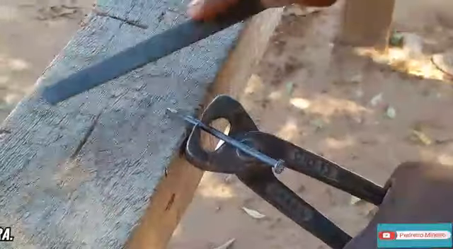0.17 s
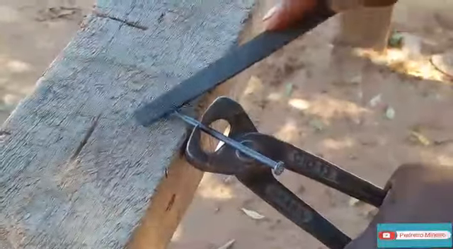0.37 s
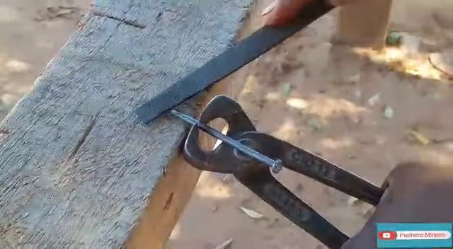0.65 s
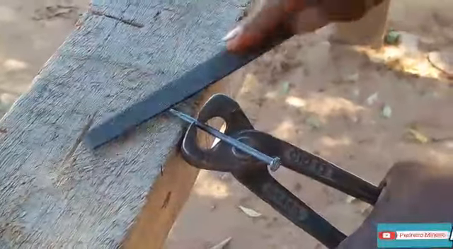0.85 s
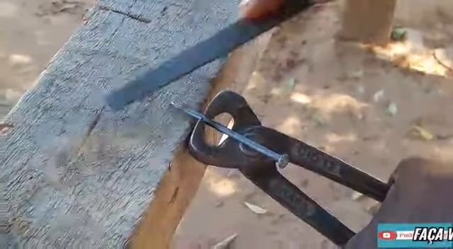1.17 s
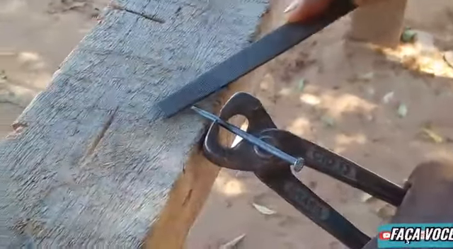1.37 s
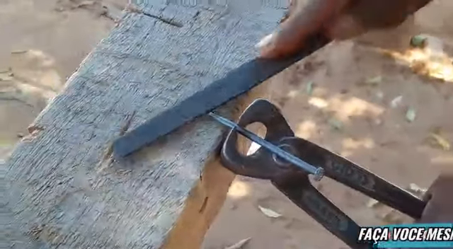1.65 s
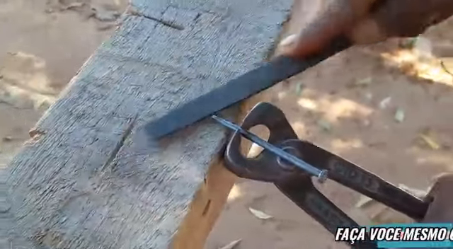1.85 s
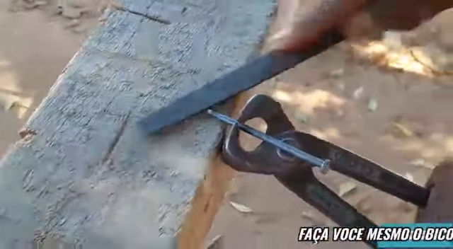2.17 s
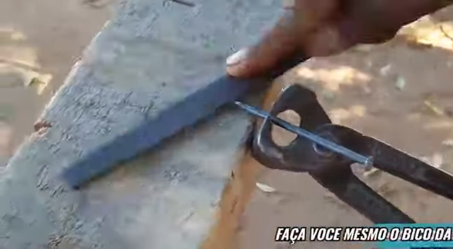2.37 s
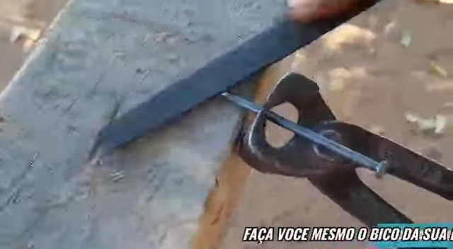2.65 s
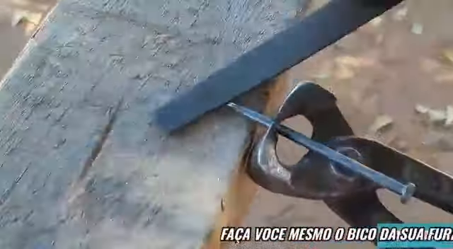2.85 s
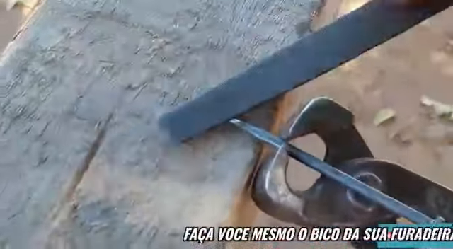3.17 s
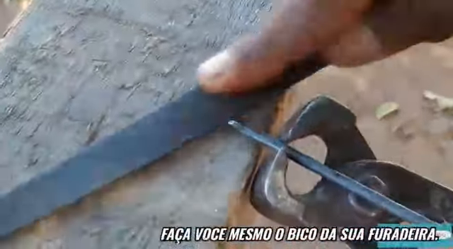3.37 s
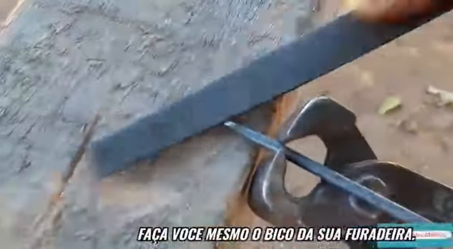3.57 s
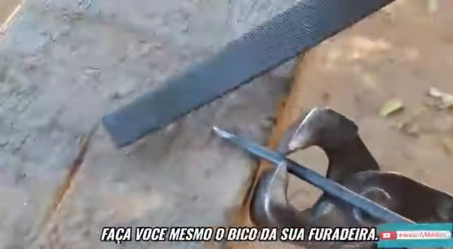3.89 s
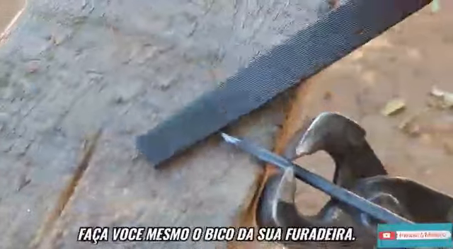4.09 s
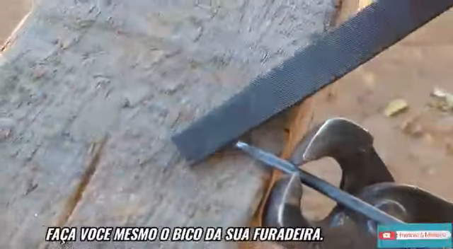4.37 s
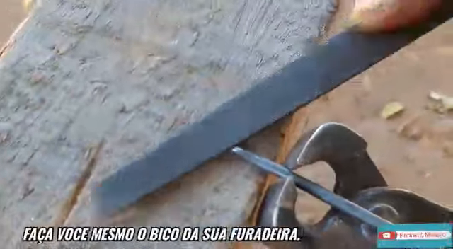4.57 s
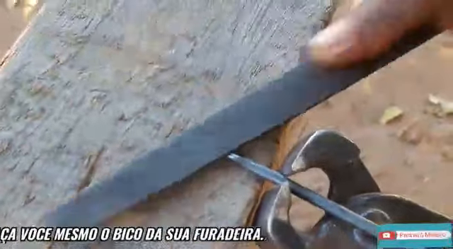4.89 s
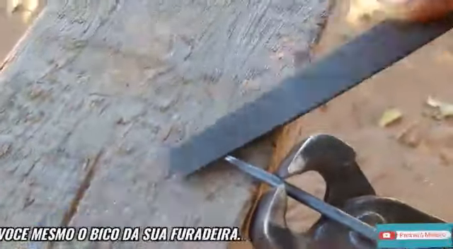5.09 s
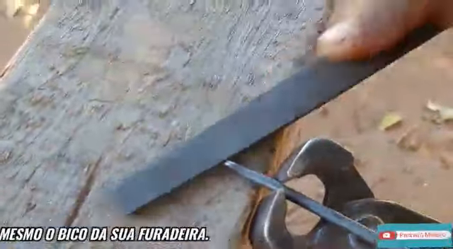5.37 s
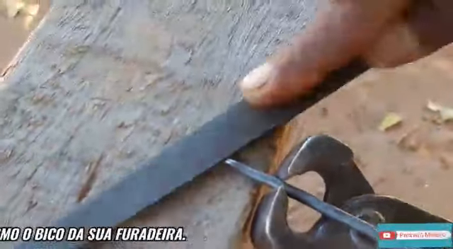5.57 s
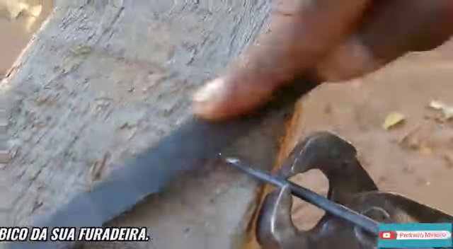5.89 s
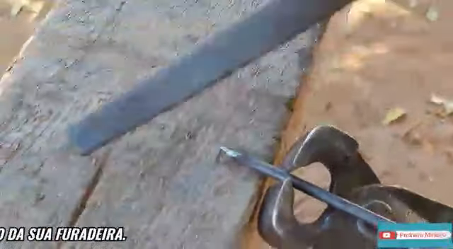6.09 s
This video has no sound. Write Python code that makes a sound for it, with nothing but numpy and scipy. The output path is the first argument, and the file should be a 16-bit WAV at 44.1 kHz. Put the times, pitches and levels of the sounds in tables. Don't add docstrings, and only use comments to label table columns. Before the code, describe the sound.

Dry, grainy metal rasping, very near and without room echo. After an opening stroke and small clicks, about six pushes alternate with lighter pulls. The file then touches, ticks and drags quietly before four more pushes and their returns, ending in faint handling and one soft stroke. Firm pushes ring steel and sing roughly; dull wooden thumps and a distant outdoor murmur lie under them.

```python
import sys
import numpy as np
from scipy import signal
from scipy.fft import rfft, irfft, next_fast_len
from scipy.io import wavfile
from scipy.ndimage import uniform_filter1d, map_coordinates

SR = 44100
rng = np.random.default_rng(int(sys.argv[2]) if len(sys.argv) > 2 else 0)


def gain_from_decibels(decibels):
    exponent = np.asarray(decibels, float) / 20
    return 10 ** exponent


def transcribe(u):
    v = np.clip(np.atleast_2d(u).T, -1, 1)
    q = np.round(v * 32767).astype(np.int16)
    wavfile.write(sys.argv[1], SR, q)


N = 274561


def unit(x):
    return x / np.sqrt(np.mean(x ** 2) + 1e-20)


def along(points, hz):
    f, v = np.transpose(points)
    return np.interp(np.log(hz + 1), np.log(f + 1), v)


def curve(rows):
    s, value = np.transpose(sorted(rows))
    return np.interp(np.arange(N) / SR, s, value)


def wobble(rate):
    knots = rng.standard_normal(int(N * rate / SR) + 4)
    return map_coordinates(knots, [np.arange(N) * rate / SR])


def filtered(x, response):
    m = next_fast_len(N + SR // 2)
    hz = np.fft.rfftfreq(m, 1 / SR)
    return irfft(rfft(x, m) * response(hz), m)[..., :N]


def noise(spectrum):
    return unit(filtered(rng.standard_normal(N), lambda hz: gain_from_decibels(along(spectrum, hz))))


def modes(peaks, hz):
    total = 0
    for k, (centre, width, db) in enumerate(peaks):
        damping = 1j * hz * width
        total = total + (-1) ** k * gain_from_decibels(db) * damping / (centre ** 2 - hz ** 2 + damping)
    return total


def yard():
    # f/Hz, level/dB per Hz
    floor_colour = [(15, -34.5), (25, -1.5), (129, -5.5), (247, -8.5), (412, -13.5), (705, -16.5),
                    (1150, -22.5), (2500, -22.5), (2710, -24.5), (5770, -35.5), (7970, -43), (15600, -41)]
    # t/s, level/dB
    floor_level = [(0, -67.5), (.3, -63), (1, -62), (3, -60), (3.8, -65.5), (5.2, -60), (5.8, -68),
                   (6.22, -61.5)]
    # middle t/s, half length/s, f/Hz, level/dB
    engines = [
        (0.562, 0.11, 237, -61.5),
        (4.874, 0.059, 549.4, -44),
        (5.143, 0.079, 549, -49),
        (5.33, 0.076, 234.4, -62),
        (5.551, 0.069, 710, -69),
        (5.71, 0.051, 555, -59),
    ]
    t = np.arange(N) / SR
    swell_db = 1.5 * wobble(9)
    out = gain_from_decibels(curve(floor_level) + swell_db) * noise(floor_colour)
    for middle, half, hz, db in engines:
        u = np.clip((t - middle) / half, -1, 1)
        phase = 2 * np.pi * np.cumsum(hz * (1 - 0.059 * u)) / SR
        out += gain_from_decibels(db) * np.sqrt(1 - u ** 2) * np.sin(phase)
    return filtered(out, lambda hz: 1 / (1 + (55 / (hz + 1)) ** 3))


def strokes():
    # start t/s, length/s, file body level/dB at full speed, pincers and plank dB above it, edge dB above it
    forward = [
        (1.062, 0.18, -27.5, -3, -6.5),
        (1.393, 0.18, -26, -6.5, -5),
        (1.73, 0.16, -28, -1, 0),
        (2.044, 0.18, -27, -0.5, -1.5),
        (2.374, .16, -27.5, 1, 2.5),
        (2.686, 0.17, -30.5, 5, 6),
        (3.988, .17, -34, 6.5, 5.5),
        (4.304, 0.17, -29.5, 6.5, 3.5),
        (4.612, .16, -28.5, 5, 2.5),
        (4.922, 0.15, -27, 2.5, 2),
    ]
    backward = [(1.22, 0.16, -31, 0.5, 1.8), (1.558, 0.17, -31, -1, 3), (1.884, .16, -33, 0, 5),
                (2.208, 0.17, -32.5, 3, 5.9), (2.524, 0.17, -34.5, 5.5, 7.6),
                (2.837, 0.17, -36.5, 3.5, 10.4), (3.82, 0.18, -41, 9, 7.1), (4.148, .16, -37, 5.5, 10),
                (4.458, 0.16, -35.5, 5.5, 9.7), (4.762, 0.17, -36.5, 5.5, 11),
                (5.066, .182, -34.5, 4.5, 9.8)]
    lone = [
        (0.05, 0.22, -33, 0, -0.5),
        (0.85, 0.19, -33, 1.5, 1),
        (5.945, .22, -42.5, 4.5, 6.5),
    ]
    for table, lean, ease in ((forward, 0.97, 1), (backward, 0.87, 1), (lone, 1.29, 1.65)):
        for s, length, db, low_db, edge_db in table:
            start, count = round(s * SR), round(length * SR)
            u = np.arange(count) / count
            speed = np.abs(np.sin(np.pi * u ** lean)) ** ease
            yield slice(start, start + count), speed, np.array([[db + low_db], [db], [db + edge_db]])


def plank():
    # f/Hz, level/dB per Hz
    thump_colour = [(53, -51), (90, -20), (189, -4.5), (490, -4), (520, -5), (680, -8), (1140, -120)]
    # middle t/s, level/dB, half length/s
    jolts = [
        (0.212, -45, 0.016),
        (1.512, -46.5, .03),
        (1.955, -47, 0.048),
        (2.988, -52, 0.069),
        (3.41, -60, 0.14),
        (4.27, -42.5, 0.044),
        (4.844, -53.5, 0.06),
        (5.183, -43.5, 0.057),
        (5.673, -55, 0.063),
    ]
    t, force = np.arange(N) / SR, np.zeros(N)
    for where, speed, levels_db in strokes():
        top_db = -51 + 0.12 * (levels_db[1] + 31.5)
        force[where] += gain_from_decibels(top_db) * speed ** 0.59
    for s, db, half in jolts:
        force += gain_from_decibels(db) * np.clip(1 - np.abs(t - s) / half, 0, 1)
    return force * gain_from_decibels(3.0 * wobble(30)) * noise(thump_colour)


def effort():
    # start t/s, hold/s, file body level/dB, pincers and plank dB above it, edge dB above it
    slides = [(0.245, 0.06, -67, 2, 3), (0.309, 0.019, -58.5, 1, -3.5), (0.36, 0.082, -77.5, 2, 9),
              (0.558, 0.022, -43, -1.5, -12), (0.638, 0.043, -62, -5, 2.5), (0.695, .05, -57, 0.5, -1.5),
              (0.77, 0.2, -63.5, -2, -6), (3.012, 0.03, -59.5, -1.5, 0), (3.07, 0.39, -66, -1.5, -6.5),
              (3.246, .055, -53.5, -2, -8), (3.353, 0.037, -58.5, 10, -8.5), (3.426, 0.033, -68, 13.5, 0.5),
              (3.504, 0.049, -47, -0.5, -9.5), (3.564, 0.064, -66, -3, 0.5),
              (3.634, 0.039, -68.5, 15.5, -2), (3.724, 0.023, -76, 16, 1), (5.224, 0.026, -58, 9, 2),
              (5.256, 0.07, -68, 0.5, -5), (5.422, 0.051, -66, -12.5, -3), (5.62, 0.087, -63, 10.5, -2.5),
              (5.855, 0.0085, -49.5, 0, -2.5), (5.916, .1, -71, 10, 3), (6.133, 0.022, -59.5, 2, 2)]
    speed_power = np.c_[[1.71, 2.07, 1.77]]
    pincers_limit_db, rest_db = -2, -82.5
    turn_db, turn_s = -29, 0.017
    land_s, lift_db_per_s = 0.0045, 555
    t, power = np.arange(N) / SR, np.full((3, N), gain_from_decibels(2 * rest_db))
    for where, speed, levels_db in strokes():
        gain = speed ** speed_power
        gain[0] = gain[0] / np.hypot(gain[0], gain_from_decibels(pincers_limit_db))
        power[:, where] += (gain_from_decibels(levels_db) * gain) ** 2
    lingering = np.abs(uniform_filter1d(power, size=round(8 * turn_s * SR), axis=1))
    power += gain_from_decibels(2 * turn_db) * lingering
    for s, hold, db, low_db, edge_db in slides:
        where = slice(round(s * SR), round((s + hold) * SR) + SR // 10)
        age = t[where] - s
        landing = np.clip(age / land_s, 0, 1)
        gain = landing * gain_from_decibels(-lift_db_per_s * np.maximum(age - hold, 0))
        power[:, where] += (gain_from_decibels([[db + low_db], [db], [db + edge_db]]) * gain) ** 2
    return 10 * np.log10(power)


def swarf(edge_db):
    # f/Hz, width/Hz, level/dB
    fizz_peaks = [(9360, 230, 0.5), (9190, 220, -6), (10695, 1000, -0.5), (10530, 380, -13),
                  (11940, 290, 4), (12980, 340, -2.5), (13700, 430, -2.5), (14000, 200, -14.5),
                  (14360, 270, -13.5), (15450, 270, -18.5)]
    fizz = filtered(rng.standard_normal(N), lambda hz: (np.abs(modes(fizz_peaks, hz)) + .3) * (hz > 8500))
    return gain_from_decibels(1.001 * edge_db - 26) * unit(fizz)


def ring(force, lo_hz, hi_hz, drift_db):
    # f/Hz, width/Hz, level/dB in the first hold, level/dB in the second
    steel = [(555, 10.4, -20, -3.5), (605.5, 46, -2, -7), (667, 87, 1.5, -6), (757, 66, -5.5, -7),
             (890, 28.7, 3.5, -13.5), (959.5, 23.5, -0.5, 0.5), (1050, 69, -4, -1), (1220, 48, -3, -6.5),
             (1415, 73, 3, -5.5), (1451, 69, -10, -0.5), (1486, 62, -15.5, 2), (1772, 27, -7, -22.5),
             (2225, 80, -9, -15), (2426, 52, -8, -8.5), (2682, 61, -7.5, -12), (2752, 67, -9, -12),
             (3137, 88, -2.5, -16.5), (3454, 84, -11, -11.5), (3914, 175, -23.5, -10.5),
             (4528, 192, -9.5, -15), (4606, 340, -2, -13), (5000, 290, -14.5, -19), (5347, 134, -13, -9),
             (5658, 190, -16.5, -18), (6590, 270, -16, -19)]
    # t/s, share of the second hold 0-1
    hold_change = [
        (1.5, 0.09),
        (2.3, 0.78),
    ]
    share = np.clip(curve(hold_change), 0, 1)
    part = [mode for mode in steel if lo_hz <= mode[0] < hi_hz]
    gains, power = [], 0
    for _, width, first_db, second_db in part:
        gain = gain_from_decibels(first_db + share * (second_db - first_db) + drift_db * wobble(20))
        gains.append(gain)
        power = power + gain ** 2 * np.pi * width / SR
    total, out = np.sqrt(power), 0
    for k, (hz, width, _, _) in enumerate(part):
        resonance = signal.iirpeak(hz, hz / width, SR)
        out = out + (-1) ** k * signal.lfilter(*resonance, force * gains[k] / total)
    return out


def taps():
    # t/s, peak level/dB, low knock dB above it, steel ring dB above it
    touches = [(0.29, -44, -27, -7), (0.316, -46.5, -5, 1), (0.41, -39.5, -3, -14.5),
               (0.555, -28.5, -36, -5.5), (0.561, -56, -29, -4), (0.569, -44, -39, -17),
               (0.576, -25.5, -39, -14), (0.59, -26, -36, -8.5), (0.653, -49, -8, -17),
               (0.693, -42.5, -2.5, -22), (1.076, -24, -27, -27), (1.407, -35, -24, -10),
               (2.059, -23.5, -15, -20), (3.038, -38.5, -27.5, -15), (3.251, -43.5, -8, -5),
               (3.289, -31.5, -14, -12.5), (3.388, -33.5, -12.5, -6), (3.499, -36, -38, 2),
               (3.547, -25, -17, -19.5), (3.611, -44, -11, -6), (3.642, -43.5, -6.5, 0),
               (3.824, -43, -12.5, 2), (4.308, -32, -30, -18), (4.899, -28, -31.5, -15.5),
               (5.43, -48, -19.5, -9), (5.628, -50, -4, -14), (5.666, -39, -28, -16),
               (5.685, -40.5, -27.5, -20), (5.706, -35.5, -21, -8.5), (5.864, -24, -40, -9)]
    force, t = np.zeros((3, N + SR)), np.arange(SR // 20) / SR
    decay_db = 60 * t / [[.006], [.025], [.015]]
    for s, db, low_db, ring_db in touches:
        levels_db = np.array([[db - 1], [db + ring_db], [db + low_db + 24.5]])
        start = round(s * SR)
        burst = gain_from_decibels(levels_db - decay_db) * rng.standard_normal((3, len(t)))
        force[:, start:start + len(t)] += burst
    click = filtered(force[0, :N], lambda hz: modes([(2465, 1800, 0.0087), (6250, 2000, -12.5)], hz))
    knock = filtered(force[2, :N], lambda hz: modes([(280, 120, 0.0074)], hz))
    return click + ring(force[1, :N], 0, 9000, drift_db=3.0) + knock


def song(low_db):
    # middle t/s, half length/s, top tooth rate f/Hz, level/dB over the low rasp,
    # sag of the rate 0-1
    firm_strokes = [(0.18, 0.075, 943, -5, .35), (0.955, 0.062, 922, -5.5, .35),
                    (1.161, 0.074, 890, -3, .25), (1.508, 0.059, 980, -2, .25),
                    (1.817, 0.057, 1025, -27, .25), (2.126, 0.078, 1050, -15, .2),
                    (2.473, 0.079, 1220, -1.5, .25), (2.771, 0.061, 1230, -4.5, .25),
                    (3.885, .035, 754, -4.5, .25), (4.073, .06, 1016, -22, .1),
                    (4.412, 0.1, 1041, -3.5, .08), (4.694, 0.1, 1040, -5, .05), (4.99, 0.04, 1123, 1, .2),
                    (6.063, 0.066, 988, -21, .2)]
    t, out = np.arange(N) / SR, np.zeros(N)
    uneven = 1 + .03 * wobble(90)
    for middle, half, top_hz, db, sag in firm_strokes:
        u = np.clip((t - middle) / half, -1, 1)
        tooth_hz = top_hz * uneven * (1 - sag * (u - .25) ** 2)
        out += gain_from_decibels(db) * (1 - u ** 2) * np.sin(2 * np.pi * np.cumsum(tooth_hz) / SR)
    hoarse = 0.76 + 0.83 * wobble(110)
    return gain_from_decibels(low_db + 2.5) * hoarse * out


def grains(rate, scatter_db, clump_db):
    hit = rng.random(N) < rate / SR
    load = np.minimum(rng.exponential(size=N), 2)
    size = gain_from_decibels(scatter_db * load + clump_db * wobble(70))
    return unit(hit * size * rng.choice([-1, 1], size=N))


def rasp(low_db, body_db, edge_db):
    teeth = grains(2500, scatter_db=0.5, clump_db=2.5)
    grit = grains(6000, scatter_db=6.5, clump_db=2.0)
    low = ring(gain_from_decibels(low_db - 1.5) * teeth, 0, 1700, drift_db=3.0)
    body = ring(gain_from_decibels(body_db - 3.5) * unit(teeth + 0.75 * grit), 1700, 4200, drift_db=3.5)
    edge = ring(gain_from_decibels(edge_db + 1.5) * unit(0.12 * teeth + grit), 4200, 9000, drift_db=3.0)
    scratch_db = .5 * body_db + .5 * edge_db - 3.5
    scratch_db = scratch_db + np.clip(0.26 * (-46.5 - scratch_db), 0, 5)
    catches = gain_from_decibels(scratch_db) * grains(1500, scatter_db=0, clump_db=3.5)
    scratch = filtered(catches, lambda hz: modes([(3850, 10400, 0.0023)], hz))
    return low + body + edge + scratch


def scene():
    # f/Hz, level/dB
    microphone = [(300, -5), (500, 3), (5600, 1.5), (6200, -3.5), (7000, -16), (7500, -23.5), (8000, -63.5)]
    low_db, body_db, edge_db = effort()
    contacts = taps()
    near = rasp(low_db, body_db, edge_db) + song(low_db) + contacts
    click_top = filtered(contacts, lambda hz: gain_from_decibels(-15) * (hz > 8500) * (hz < 15500))
    heard = filtered(near, lambda hz: gain_from_decibels(along(microphone, hz)))
    mono = heard + plank() + click_top + swarf(edge_db) + yard()
    return np.array([mono, mono])


def smooth_noise(shape, bands, frames):
    patches = uniform_filter1d(rng.standard_normal(shape), size=bands, axis=0)
    return unit(uniform_filter1d(patches, size=frames, axis=1))


def thin_treble(hz, t, z):
    hz = hz[:, None]
    loudest = uniform_filter1d(np.abs(z).max(axis=0), size=5)
    busy = np.clip(loudest / gain_from_decibels(-56.0), 0, 1)
    flicker_db = 6.5 * smooth_noise(z.shape, 4, 12)
    z = z * gain_from_decibels(np.clip((hz - 5800) / 2500, 0, 1) * busy * flicker_db)
    band = np.sqrt(np.abs(uniform_filter1d(np.abs(z) ** 2, size=4, axis=0)))
    under_db = np.interp(t, [1.5, 1.65], [-41, -46])
    return z * ((band > loudest * gain_from_decibels(under_db)) | (hz < 5800))


def side_spread(hz, t, z):
    # f/Hz, level/dB
    difference = [(60, -5), (110, -7), (200, -11), (380, -11), (700, -21), (1290, -22), (2380, -16),
                  (4400, -19), (8120, -7), (15000, -3.5)]
    pairs = 4 * rng.standard_normal(len(t) // 2 + 1)
    frame = unit(gain_from_decibels(pairs.repeat(2)[:len(t)]))
    kept = smooth_noise(z.shape, 70, 4) + .6 * smooth_noise(z.shape, 3, 1) > -.45
    level = gain_from_decibels(along(difference, hz)[:, None] + 1.7)
    size = uniform_filter1d(np.abs(z), size=3, axis=1) * level * frame * kept
    size = np.minimum(size, 8 * np.roll(size, 1, axis=1))
    return size * np.exp(2j * np.pi * rng.random(z.shape))


def roll_off(x):
    return signal.sosfilt(signal.butter(12, 15770, fs=SR, output="sos"), x)


def record(dry):
    hz, t, z = signal.stft(dry[0], SR, nperseg=1024)
    z = thin_treble(hz, t, z)
    spread = side_spread(hz, t, z)
    mid, side = signal.istft(np.array([z, spread]), SR, nperseg=1024)[1][:, :N]
    return roll_off(np.array([mid + side, mid - side]))


dry = scene()
out = record(dry)
transcribe(out)
```